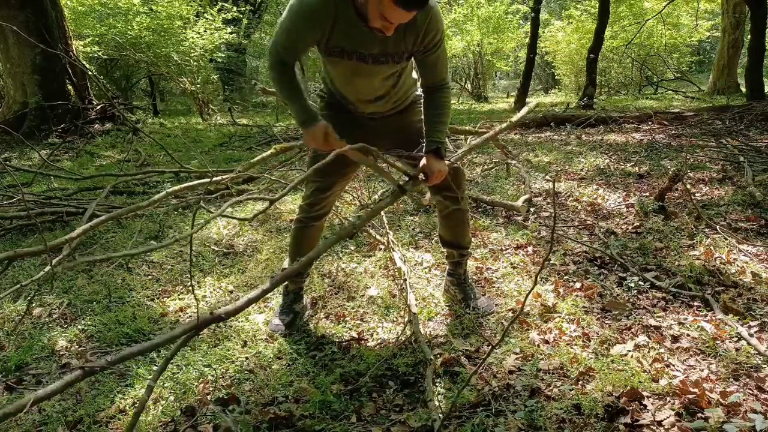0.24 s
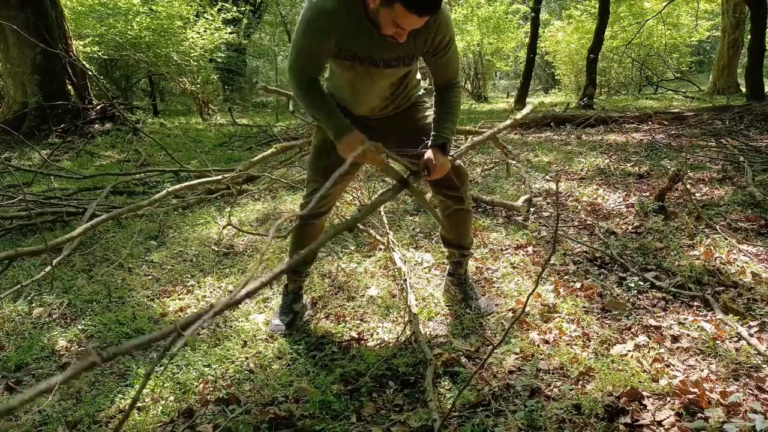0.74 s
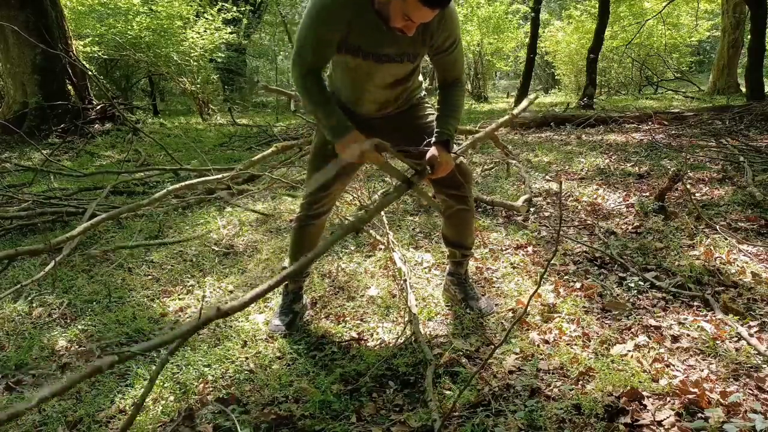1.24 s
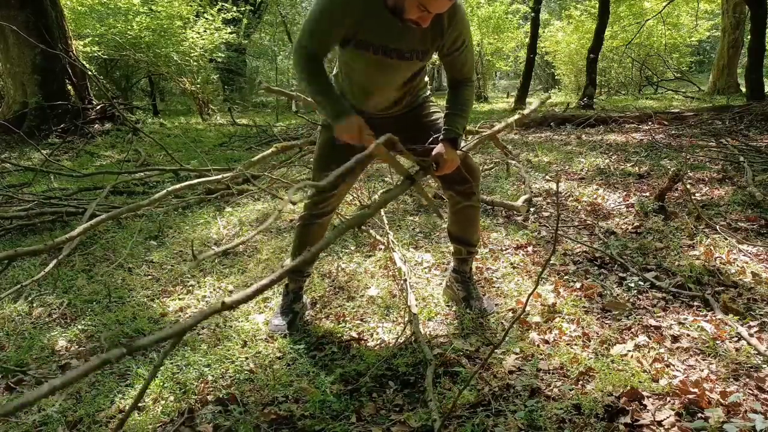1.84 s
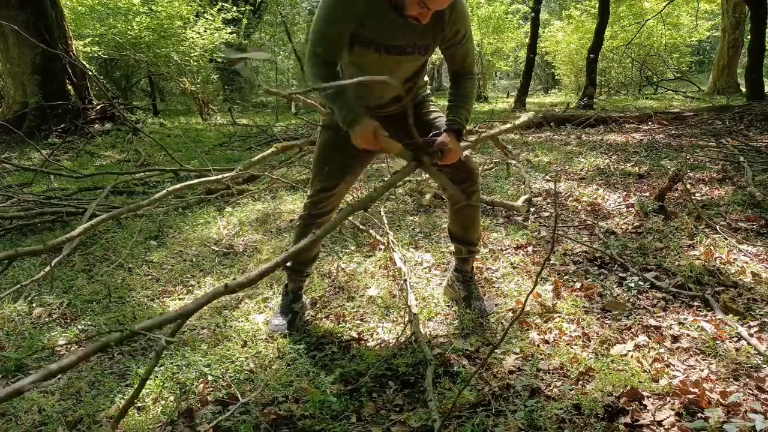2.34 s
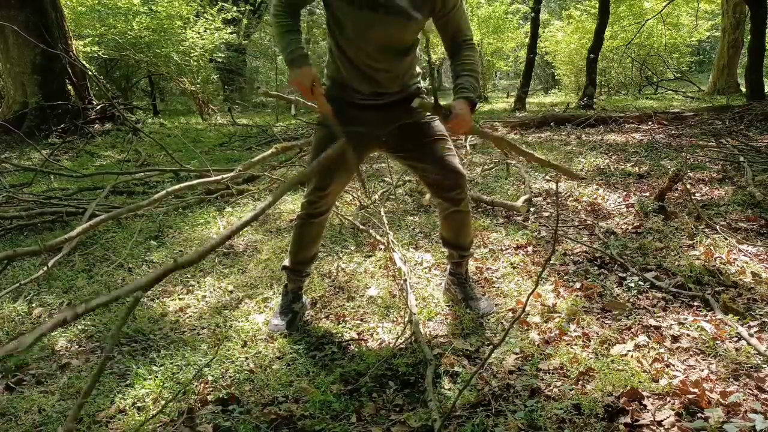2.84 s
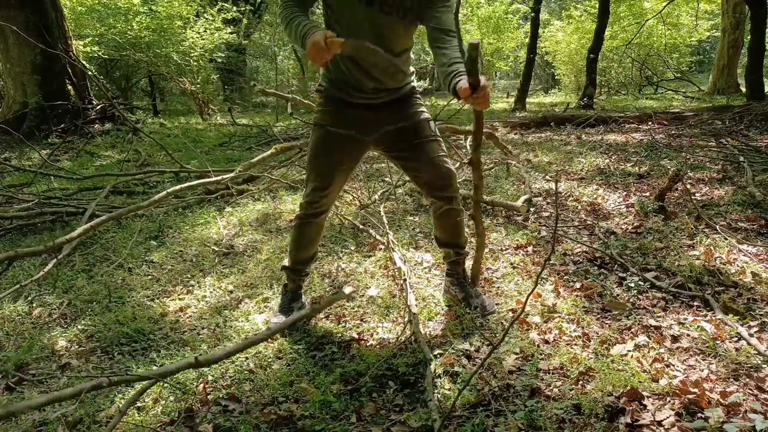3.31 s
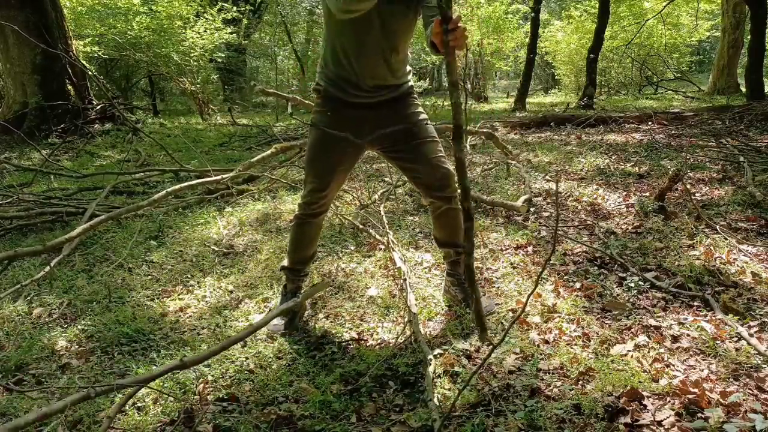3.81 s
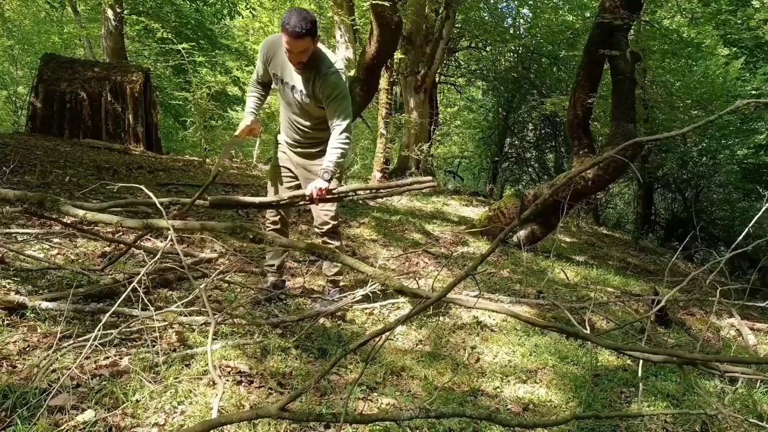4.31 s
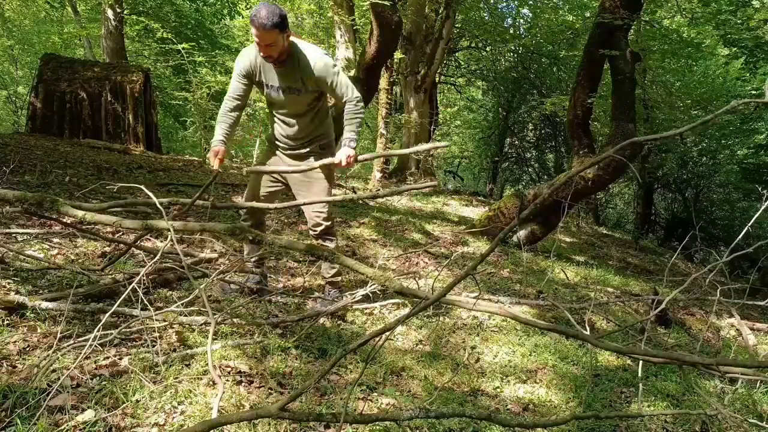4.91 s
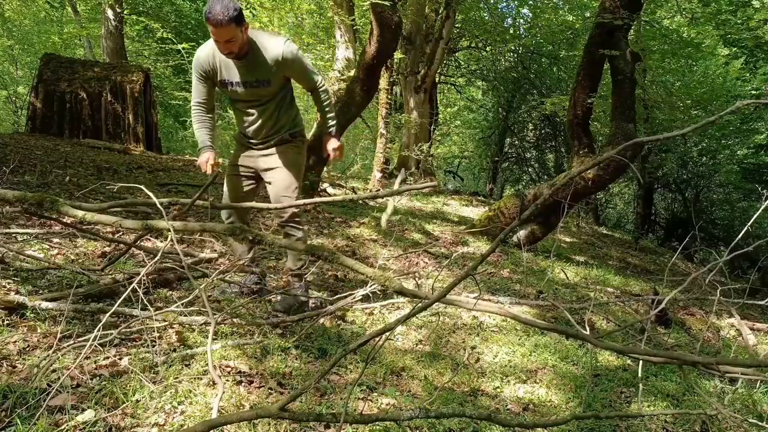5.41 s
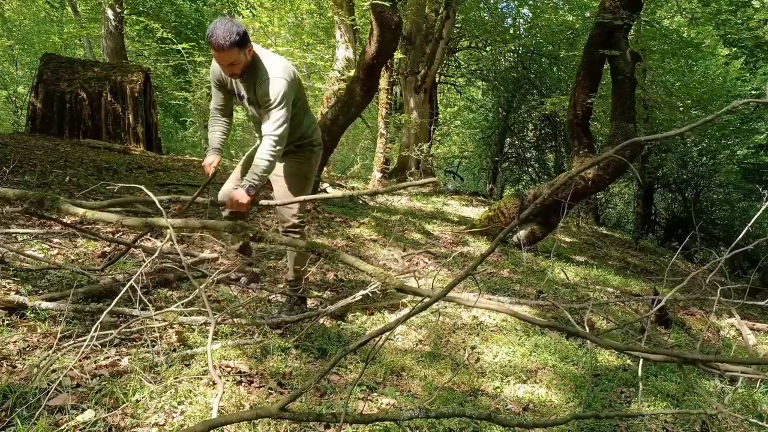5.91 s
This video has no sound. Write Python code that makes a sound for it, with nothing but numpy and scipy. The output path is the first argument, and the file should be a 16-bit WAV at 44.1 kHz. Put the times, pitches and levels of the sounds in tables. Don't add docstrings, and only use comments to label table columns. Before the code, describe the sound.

Brisk rasping strokes on wood, about seven a second, start softly and build with sharp dry cracks and a woody ring. The branch gives way, followed by thinning leaf rustle, twig snaps, a dull step and a hollow stick knock. The scene cuts to a hushed forest with distant birds and sparse ticks, ending in far-off rustling tugs and a dropped stick. Airy natural ambience, short scatter from trunks.

```python
import sys
import numpy as np
from scipy import signal
from scipy.fft import rfft, irfft, next_fast_len
from scipy.io import wavfile
from scipy.ndimage import uniform_filter1d

SR = 44100
rng = np.random.default_rng(int(sys.argv[2]) if len(sys.argv) > 2 else 0)


def put_to_file(sound):
    columns = np.atleast_2d(sound).T
    safe = np.clip(columns, -1, 1)
    whole_steps = np.round(safe * 32767)
    wavfile.write(sys.argv[1], SR, whole_steps.astype(np.int16))


def invert_db(x):
    u = np.asarray(x, float) / 20
    return 10 ** u


N = 271215

# (from [Hz], to [Hz])
ZONES_HZ = [(2000, 7000), (100, 500), (600, 1600), (9000, 15500)]
# (frequency [Hz], density [dB per Hz])
RUB_COLOUR = [(15, -72), (25, -34.5), (166, -8.5), (223, -4.5), (416, -6.5), (607, -4), (754, -4.5),
              (1330, -3.5), (1890, -3.5), (2280, -5.5), (2480, -3.5), (5570, -4), (8360, -11),
              (12900, -0.5), (16000, -6)]
# (frequency [Hz], width [Hz], level [dB])
BRANCH_MODES = [(230, 85, -5.5), (622, 69, -4.5), (1445, 300, -7.5), (2205, 450, -5.5), (3300, 910, -8.5),
                (5400, 550, -13.5)]
# (frequency [Hz], likeness [0-1])
LIKENESS = [(60, 0.4), (130, 0.9), (290, 0.75), (640, 0.5), (1410, 0.2), (3100, 0), (6820, 0), (15000, 0)]
# (frequency [Hz], density [dB per Hz])
AIR_COLOUR = [(15, -47), (25, -4), (134, 2.5), (677, -4.5), (1290, -10), (1790, -9.5), (2280, -20.5),
              (3430, -20), (5140, -23), (7310, -12.5), (16000, -32)]
# (frequency [Hz], left minus right [dB])
CAPSULE_LEAN = [(2000, 0.5), (6000, -1.4), (14000, -2)]
# (time [s], left minus right [dB])
PAN = [(0, -0.5), (.5, -0.1), (2.4, -0.7), (2.7, 0.7), (3.9, -1.3), (4.3, -2), (5.0, -1.3), (6.15, -0.27)]
# (time [s], level [dB])
STIR = [(0, -56.5), (.15, -64), (.33, -49.5), (1.1, -41.5), (2.1, -38.5), (2.4, -43.5), (2.68, -49.5),
        (3.05, -46), (3.3, -46), (3.55, -63), (3.89, -67.5), (4.02, -63), (4.14, -73.5), (4.3, -86.5),
        (4.55, -89.5), (4.67, -70.5), (5.15, -66.5), (5.38, -76)]
# (crest start [s], hold [s], crest [dB], sizzle re rasp [dB], branch ring [dB])
PUSHES = [
    (.052, 0.09, -41, 2, -0.5),
    (.362, 0.069, -33.5, -1, -0.5),
    (.637, 0.064, -33, 1, -1.5),
    (.918, 0.047, -29, 2, 1),
    (1.165, 0.072, -31, 0, 0.5),
    (1.447, 0.072, -28, .5, -1),
    (1.724, 0.074, -32.5, 4.5, 1.5),
    (1.993, 0.07, -29.5, -0.5, 2),
    (2.287, 0.051, -29.5, 2.5, 0),
]
# (crest start [s], hold [s], crest [dB], sizzle re rasp [dB], branch ring [dB])
PULLS = [(.192, 0.089, -35, -2.5, 1.5), (.484, 0.1, -29.5, -4, -3), (.578, 0.067, -35, -1, -2.5),
         (.758, 0.09, -31.5, 1.5, -0.5), (1.028, 0.098, -30.5, -0.5, -1), (1.3, 0.073, -28.5, -4, -2.5),
         (1.562, 0.07, -30, -2, 1), (1.847, 0.077, -33, -2.5, 0.5), (2.113, 0.054, -28.5, -2, 0.5),
         (2.413, .022, -30, 2, 0.5), (2.463, .034, -29, -1.5, -2)]
# (crest start [s], hold [s], crest [dB], sizzle re rasp [dB])
DRAGS = [(.302, 0.037, -42, 6), (.88, 0.015, -34, 4), (1.149, 0.0098, -29, 3), (1.415, 0.027, -41, 4.5),
         (1.677, .03, -34, 1.5), (1.935, .045, -38, 3), (2.238, .018, -39, -4), (2.563, 0.065, -43.5, 4.5),
         (2.715, 0.042, -36.5, -3.5), (2.875, 0.071, -36.5, 2.5), (3.009, 0.055, -41.5, 5),
         (3.163, 0.017, -38, 2), (3.21, 0.031, -41.5, 7), (3.288, 0.0265, -44, 7), (3.404, 0.015, -40.5, 5),
         (3.441, 0.043, -41, 5), (3.557, 0.14, -56, 4.5), (3.702, 0.035, -69, 16), (3.85, 0.03, -63, -13),
         (3.928, 0.035, -44.5, 2.5), (3.994, 0.022, -66, 8), (4.072, 0.064, -67, 9)]
# (crest start [s], hold [s], crest [dB], sizzle re rasp [dB])
FAR_DRAGS = [(4.611, 0.037, -69, 8.5), (4.724, 0.0534, -64, 15), (4.864, 0.066, -53, 3.5),
             (4.963, .062, -68.5, 7), (5.031, .061, -58.5, 4.5), (5.202, 0.02, -66.5, 11)]
# (crest start [s], hold [s], crest [dB], sizzle re rasp [dB], branch ring [dB])
FAR_TUGS = [
    (5.426, 0.039, -58, 9.5, 0),
    (5.485, 0.027, -45.5, 2.5, 3.5),
    (5.53, 0.033, -43, -1, -3),
    (5.577, 0.075, -41, 1.3, 2),
    (5.65, 0.13, -51.5, 2.5, 1),
    (5.785, .075, -47.5, 6, -1),
    (5.87, 0.058, -56, 6.5, -1),
    (5.925, .1, -49, 2.5, 4),
    (6.03, 0.12, -59, 1, 0),
    (6.115, 0.054, -54, 6.5, 7),
]
# (rise [dB/s], fall [dB/s], wood body re rasp [dB], branch ring re rasp [dB])
PUSH = (600, 601, -15.5, -8)
PULL = (652, 652, -24, -7.5)
DRAG = (354, 174, -20.5, -11)
FAR_DRAG = (324, 103, -15, -18)
FAR_TUG = (500, 350, -14, -12)
# (time [s], peak [dB], ring [Hz], bright edge re
# peak [dB])
TICKS = [(.1622, -46, 3700, 11), (0.4336, -29.5, 5000, 7), (.824, -17.5, 5770, -3.5),
         (0.9407, -21.5, 2240, 5.5), (.951, -23.5, 5500, 1), (1.1747, -12.5, 5250, 0),
         (1.449, -20.5, 5680, -3), (1.469, -24, 5000, -4), (1.5747, -14, 4220, 2), (1.7236, -34, 4130, 3),
         (1.794, -23, 5000, 3), (1.8185, -26, 2500, -10), (1.924, -25, 6630, 7), (2.1387, -15, 3300, -9.5),
         (2.201, -27.5, 3790, -8), (2.2472, -27, 5170, 7), (2.4278, -20.5, 3700, -1.5),
         (2.4288, -18, 2000, -15), (2.4418, -21, 2050, -15), (2.4428, -16, 5370, -3.5),
         (2.4858, -17, 1620, -18), (.7722, -23, 2210, -10), (2.4666, -22, 5040, 3), (2.7213, -34, 5000, -2),
         (2.742, -21, 4560, -8), (2.801, -40, 5500, -6), (2.823, -28.5, 4910, -11), (2.889, -30, 5500, -3),
         (2.924, -28, 4600, -8), (3.156, -37, 5000, 11), (3.1946, -32, 7490, 4), (3.296, -35, 6000, 10),
         (3.308, -34, 8000, 7), (3.377, -29, 4910, -10), (3.4098, -35, 6000, 10), (3.469, -31, 8000, 3),
         (3.7155, -51, 4220, 10), (3.7812, -48, 5000, 6), (3.9045, -50, 5000, 8),
               (3.9195, -44, 5000, 12), (4.0007, -41, 7230, 1), (4.0367, -43, 4910, 1),
               (4.1429, -66, 5860, 13), (4.1478, -51, 6200, 3), (4.2035, -58, 4100, 4),
               (4.3816, -59, 6930, -7), (4.4206, -68, 7000, -5), (4.7653, -50, 6030, 8),
               (4.8059, -54, 7150, 11), (4.993, -50, 5340, 9), (5.2363, -57, 5000, 8),
               (5.3572, -59, 5080, 8), (5.425, -55, 5080, 12), (5.5124, -41, 3360, 13),
               (5.814, -37, 6000, 0), (5.847, -35.5, 6500, 2), (6.0405, -44, 6630, 7)]
# (time [s], peak [dB], ring [Hz], tick re peak [dB])
FIBRES = [(0.5428, -27, 2630, -11), (0.601, -23.5, 5470, -9.5), (.824, -19.5, 5800, -11),
          (0.8846, -23, 4020, 4), (0.931, -27.5, 3525, 2), (1.1735, -19.5, 6380, -2),
          (1.3219, -19.5, 3010, -0.5), (1.4482, -26, 2300, -10), (1.562, -25, 4000, -7),
          (1.5805, -20.5, 3410, -3), (1.723, -24.5, 4400, 1), (1.9916, -25.5, 1770, -9),
          (2.138, -20.5, 3200, -6), (2.165, -17, 5340, -10), (2.1997, -25.5, 5100, -10.5),
          (2.2418, -22.5, 5500, 1.5), (2.412, -25, 4820, -8), (2.4264, -21.5, 4520, -9),
          (2.441, -16, 5480, -7.5), (2.465, -23.5, 5100, -5), (2.4842, -17, 1751, -12)]
# (time [s], peak [dB], ring [Hz], tick re peak [dB], thud re peak [dB])
TWIGS = [(2.7412, -28, 2090, 2.5, -20), (2.7195, -36, 880, -4, -26), (2.957, -39, 850, 6, -15),
         (2.821, -30, 4750, -11, -41), (2.8464, -39, 6940, 10, -26), (2.9212, -24.5, 1190, -14, -22),
         (3.024, -40.5, 2080, 20, -30), (3.1188, -35.5, 1130, -1.96, -22.5), (3.136, -35, 1160, -2.5, -15),
         (3.1654, -31, 5400, 6, 5.5), (3.2216, -32, 5100, 3, -22), (3.3253, -36, 5800, 13, 2),
         (3.3758, -35, 4100, -11, -35), (3.4165, -31.5, 6550, 6.5, -7), (3.4651, -35, 5880, 2, -32),
         (3.746, -47.5, 5400, 9, -25), (3.828, -49.5, 1470, -31, 3), (3.905, -55.5, 3070, 11, -19),
         (3.933, -45.5, 2240, 17, -29.5), (3.9998, -50, 2190, -8, -28)]
# (time [s], peak [dB], ring [Hz], tick re peak [dB], thud re peak [dB])
FAR_TWIGS = [(4.2153, -61.5, 5570, 5, -25), (4.3804, -71, 1815, -6, -18), (4.5211, -68.5, 3890, -8.5, -8.5),
             (4.605, -57, 3360, 0, -26), (4.8044, -60.5, 6800, 19, -22), (4.8918, -52, 4900, 16.5, 8),
             (5.08, -55, 1230, -8, 8), (5.448, -47.5, 1760, 2, 10), (5.5443, -42, 1910, 3, 3),
             (5.787, -45, 1090, -9.5, -10), (5.8104, -38, 6800, -10, -8)]
# (time [s], peak [dB], pitch [Hz], length [s])
STEPS = [(3.217, -41.5, 460, 0.027), (3.233, -43.5, 190, 0.031), (3.925, -55, 256, 0.028),
         (4.722, -57, 460, 0.058), (4.894, -61, 625, 0.027), (5.296, -66.5, 498, 0.039),
         (5.603, -39.5, 226, 0.041), (5.804, -40.5, 620, 0.012), (5.811, -58, 226, 0.038),
         (5.928, -54.5, 750, 0.11), (5.955, -61.5, 129, 0.076), (6.086, -60, 223, 0.024),
         (6.096, -54.5, 990, 0.096)]
# (time [s], peak [dB], bounce spread [s])
KNOCK = [
    (3.6205, -27.5, 0.00602),
]
# (time [s], peak [dB], bounce spread [s])
DROP = [
    (5.5792, -20.5, .012),
]
# (frequency [Hz], level [dB], T60 [s])
KNOCK_MODES = [(1258, -6.5, 0.11), (1620, -7, 0.072), (1980, -3, 0.084), (2300, -0.5, 0.072),
               (2890, -4.5, 0.049), (3440, -7, 0.047), (4685, -6, 0.039)]
# (frequency [Hz], level [dB], T60 [s])
DROP_MODES = [(226, -8.5, .09), (403, -2, 0.048), (653, -5.5, 0.11), (1010, 0, 0.077), (1350, -4.5, 0.068),
              (1460, -1, 0.046), (2220, -6, 0.025), (2660, -6, 0.026), (3400, -0.5, 0.0084)]
# (time [s], length [s], from [Hz], to [Hz], level [dB])
WHISTLES = [(4.335, .025, 3750, 3150, -82), (4.475, .045, 4500, 4100, -79), (4.515, .05, 3950, 3750, -80),
            (4.53, .04, 3600, 3320, -80), (4.515, .06, 4650, 4350, -84), (4.56, .09, 3330, 3300, -72),
            (4.56, .11, 4300, 3900, -80), (4.63, .08, 7300, 7100, -80), (4.655, .09, 3290, 3260, -77),
            (4.675, .03, 3750, 3650, -78), (4.715, .09, 3500, 3460, -74), (5.133, .046, 3150, 3040, -69),
            (5.18, .04, 3150, 2900, -78), (5.245, .036, 4200, 4100, -78), (5.3, .13, 2320, 2260, -79),
            (5.303, .045, 3850, 3830, -78), (6.12, .036, 3980, 3920, -63)]

AIR_DB = -77
BREAK_S = 2.5
SHOULDER_DB, REST_SIZZLE_DB = 5.5, 1.5
STIR_BODY_DB, STIR_BRANCH_DB = -18, -11
STEP_BODY_DB, STEP_FALL_DB_S = -13, 200.5
BODY_LAG_S = 0.015
SETTLE_DB_S = 3.5
RUMBLE_HZ, RUMBLE_S = 110, 0.22
GRIP_SHIFT, GRIP_SWING_DB = 0.047, 6.5
TICK_T60_S, EDGE_HZ, EDGE_T60_S = 0.0056, 12700, 0.0034
CRUMBLE_DB, CRUMBLE_T60_S = -6.5, 0.016
SNAP_T60_S, SNAP_T60_SLOPE = 0.049, 0.23
CLICK_DB, FIBRE_THUD_DB = -6, -25
TREES_T60_S, TREES_DB = 0.077, -19
GAP_START_S, GAP_END_S, GAP_FADE_S = 4.122, 4.138, 0.002
TOP_HZ = 15900
SIDES = np.array([[1], [-1]])


def colour(x, points):
    size = next_fast_len(x.shape[-1])
    hz, db = np.transpose(points)
    bin_hz = np.arange(size // 2 + 1) * SR / size
    gain = invert_db(np.interp(np.log(bin_hz + 1), np.log(hz), db))
    return irfft(rfft(x, size) * gain, size)[..., :x.shape[-1]]


def band(x, lo_hz, hi_hz):
    sos = signal.butter(2, [lo_hz, min(hi_hz, 0.45 * SR)], "band", fs=SR, output="sos")
    return signal.sosfilt(sos, x)


def unit(x):
    return x / np.sqrt(np.mean(x ** 2))


def walk(rate_hz):
    k = int(SR / rate_hz)
    held = np.repeat(rng.standard_normal(N // k + 1), k)
    return 1.18 * uniform_filter1d(held, k)[:N]


def pair(hz, size):
    like_hz, likeness = np.transpose(LIKENESS)
    like = np.clip(np.interp(np.log(hz), np.log(like_hz), likeness), 0, 1) ** 0.49
    mid, side = rng.standard_normal((2, size))
    return np.sqrt((1 + like) / 2) * mid + np.sqrt((1 - like) / 2) * side * SIDES


def ring(hz, t60_s, size):
    t = np.arange(size) / SR
    return np.sin(2 * np.pi * hz * t) * invert_db(-60 * t / max(t60_s, 1e-3))


def add(out, s, x):
    i = int(s * SR)
    out[:, i:i + x.shape[-1]] += x[..., :N - i]


def trees(x, t60_s, db):
    t = np.arange(SR // 2) / SR
    tail = rng.standard_normal((2, len(t))) * invert_db(-60 * t / t60_s) * (t > 0.004)
    tail *= invert_db(db) / np.sqrt((tail ** 2).sum(axis=1, keepdims=True))
    return x + signal.fftconvolve(x, tail, axes=1)[:, :N]


def air():
    mid, side = rng.standard_normal((2, N))
    level = invert_db(AIR_DB + 1.0 + 0.8 * walk(2.1))
    return level * unit(colour(mid + 0.93 * side * SIDES, AIR_COLOUR))


def swell(t, s, hold_s, crest_db, rise_db_s, fall_db_s):
    off_centre = np.abs(2 * (t - s) / max(hold_s, 0.004) - 1)
    crest = crest_db - SHOULDER_DB * np.minimum(off_centre, 1)
    return crest - rise_db_s * np.maximum(s - t, 0) - fall_db_s * np.maximum(t - s - hold_s, 0)


def effort(t):
    grid_s = np.arange(0, N / SR + 0.1, 0.001)
    rest_db = np.array([[0], [STIR_BODY_DB], [STIR_BRANCH_DB], [REST_SIZZLE_DB]])
    power = invert_db(2 * (np.interp(grid_s, *np.transpose(STIR)) + rest_db))
    kinds = ((PUSHES, PUSH), (PULLS, PULL), (DRAGS, DRAG), (FAR_DRAGS, FAR_DRAG), (FAR_TUGS, FAR_TUG))
    for rows, (rise_db_s, fall_db_s, body_db, branch_db) in kinds:
        for s, hold_s, crest_db, sizzle_db, *ring_db in rows:
            level_db = swell(grid_s, s, hold_s, crest_db, rise_db_s, fall_db_s)
            share_db = np.array([[0], [body_db], [branch_db + sum(ring_db)], [sizzle_db]])
            power = power + invert_db(2 * (level_db + share_db))
    rasp, body, branch, sizzle = 10 * np.log10(power)
    tread = sum(invert_db(2 * swell(grid_s, s, length_s, db + STEP_BODY_DB, 900, STEP_FALL_DB_S))
                for s, db, hz, length_s in STEPS)
    body = np.interp(grid_s - BODY_LAG_S, grid_s, body)
    body = body - SETTLE_DB_S * (np.minimum(grid_s, BREAK_S) - 1)
    body = 10 * np.log10(invert_db(2 * body) + tread)
    return [np.interp(t, grid_s, db) for db in (rasp, body, branch, sizzle)]


def crackle(rate_hz, spread_db, tail_s):
    size_db = spread_db * rng.exponential(1, N).clip(0, 3.4)
    hits = (rng.random(N) < rate_hz / SR) * invert_db(2 * size_db)
    power = signal.lfilter([1], [1, -np.exp(-1 / (max(tail_s, 1e-4) * SR))], hits)
    return power / power.mean()


def rustle(zone_db):
    f = np.arange(20, 16000.)
    hz, db = np.transpose(RUB_COLOUR)
    power = invert_db(2 * np.interp(np.log(f), np.log(hz), db))
    lift_db = []
    for db, (lo, hi) in zip(zone_db, ZONES_HZ):
        zone_power = power[(f > lo) & (f < hi)].sum() * 2 / SR
        lift_db.append(db - 10 * np.log10(zone_power))
    lift_db = np.array(lift_db)[[1, 2, 0, 3]]
    centres = np.log([250, 1400, 4800, 12000])
    shared = 0.42 + 0.34 * crackle(1500, 3.6, 0.0022) + 0.17 * crackle(130, 4.2, 0.0062)
    out = np.zeros((2, N))
    for hz in 30 * 2 ** np.arange(0, 9.3, 0.5):
        place = np.interp(np.log(hz), centres, np.arange(4))
        k = min(int(place), 2)
        db = lift_db[k] + (place - k) * (lift_db[k + 1] - lift_db[k]) + 1.86 * walk(25)
        if hz < RUMBLE_HZ:
            db = uniform_filter1d(db, int(RUMBLE_S * SR))
        own = 0.42 + 0.27 * crackle(40 + hz / 30, 4.7, 16.0 / hz + 0.0014)
        push = pair(hz, N) * np.sqrt(shared * own)
        out += invert_db(db) * band(push, hz / 2 ** 0.24, hz * 2 ** 0.29)
    rung = np.zeros((2, N))
    for hz, width_hz, db in BRANCH_MODES:
        for k in (1 - GRIP_SHIFT, 1 + GRIP_SHIFT):
            swing = invert_db(db - 4 + GRIP_SWING_DB * np.minimum(walk(12), 1.5))
            rung += swing * band(out, hz * k - width_hz / 4.14, hz * k + width_hz / 3.4)
    sawing = np.where(np.arange(N) / SR < BREAK_S, 1, 0.3)
    return colour(out + invert_db(-0.5) * sawing * rung, RUB_COLOUR)


def strain(t, hush_db=0.5, before_s=0.016, lift_db=5.5, lift_s=0.0076):
    grid_s = np.arange(0, N / SR + 0.1, 0.001)
    loading = sum(np.exp(-((grid_s - row[0] + before_s) / before_s) ** 2) for row in breaks())
    airborne = sum(np.exp(-((grid_s - row[0] + lift_s) / lift_s) ** 2) for row in KNOCK + DROP)
    return invert_db(-np.interp(t, grid_s, hush_db * loading + lift_db * airborne))


def ticks():
    out, size = np.zeros((2, N)), 1024
    crumble = invert_db(CRUMBLE_DB - 60 * np.arange(size) / SR / CRUMBLE_T60_S)
    for s, db, hz, edge_db in TICKS:
        low, high = rng.standard_normal((2, 2, size))
        body = ring(hz, TICK_T60_S, size) + crumble * unit(band(low, hz / 1.6, hz * 1.4))
        edge = ring(EDGE_HZ, EDGE_T60_S, size) + crumble * unit(band(high, 10000, 16000))
        add(out, s, invert_db(db - 4.0) * (body + invert_db(edge_db) * edge))
    return out


def breaks():
    rows = [tuple(row) + (FIBRE_THUD_DB,) for row in FIBRES] + list(TWIGS) + list(FAR_TWIGS)
    return [(s, db, hz, thud_db, tick_db, SNAP_T60_S * (hz / 1000) ** -SNAP_T60_SLOPE)
            for s, db, hz, tick_db, thud_db in rows]


def snaps():
    out, size = np.zeros((2, N)), 4096
    t = np.arange(size) / SR
    for s, db, hz, thud_db, tick_db, t60_s in breaks():
        fall = invert_db(-60 * t / max(t60_s, 0.004)) * np.minimum(t / 0.00062, 1)
        fall = 1.02 * fall + 0.49 * np.exp(-((t - 0.0012) / 0.00066) ** 2)
        tear = 0.38 * unit(band(pair(hz, size), hz / 1.29, hz * 1.185))
        tear = tear + 0.3 * unit(band(pair(hz, size), 1200, 7500))
        tick_gain = invert_db(max(tick_db, -8))
        tick = tick_gain * unit(band(pair(12000, size), 11000, 23000))
        thud = unit(band(pair(400, size), 180, 1100))
        thud = thud * invert_db(-30 * t / max(t60_s, 0.004)) * np.minimum(t / 0.0063, 1)
        snap = (tear + 0.73 * tick) * fall + 0.19 * ring(hz, 1.3 * t60_s, size) + 0.2 * invert_db(thud_db) * thud
        add(out, s, invert_db(db) * snap)
        click = ring(hz, 0.0091, 256) + tick_gain * ring(12600, 0.002, 256)
        add(out, s + 0.000802, invert_db(db + CLICK_DB) * np.ones((2, 1)) * click)
    return out


def steps():
    out, size = np.zeros((2, N)), 8192
    t = np.arange(size) / SR
    for s, db, hz, length_s in STEPS:
        shape = np.minimum(t / 0.014, 1) * np.exp(-(t / length_s) ** 3)
        add(out, s, invert_db(db - 4.0) * shape * unit(band(pair(hz, size), hz / 1.5, hz * 1.23)))
    return out


def stick(event, modes, count, longest_s, crunch_db):
    out, size = np.zeros((2, N)), 8192
    s, db, spread_s = event[0]
    for k, chance in enumerate(rng.standard_normal((count, 2, len(modes)))):
        hit = np.zeros(size)
        for (hz, mode_db, t60_s), c, e in zip(modes, *chance):
            mode = ring(hz * (1 + 0.0094 * e), min(t60_s, longest_s), size)
            hit += invert_db(mode_db + 0.63 * c) * np.sign(c) * mode
        add(out, s + spread_s * k / count, invert_db(db - 14.0 - 4.7 * k / count) * hit)
    grind = sum(invert_db(mode_db) * unit(band(pair(hz, size), hz / 1.1, hz * 1.195))
                for hz, mode_db, t60_s in modes)
    fade_db = -60 * np.arange(size) / SR / (1.64 * longest_s)
    add(out, s, invert_db(db + crunch_db + fade_db) * grind)
    return band(out, 140, 9000)


def birds():
    out, waver = np.zeros((2, N)), 1 + 0.008 * walk(90)
    for s, length_s, from_hz, to_hz, db in WHISTLES:
        size = int(length_s * SR)
        pitch_hz = np.linspace(from_hz, to_hz, size) * waver[int(s * SR) - size:][:size]
        tone = np.sin(2 * np.pi * np.cumsum(pitch_hz) / SR)
        add(out, s, invert_db(db + 2) * signal.windows.tukey(size, 0.5) * tone)
    return trees(out, 0.32, 2.5)


def scene():
    t = np.arange(N) / SR
    pan_db = np.interp(t, *np.transpose(PAN))
    sticks = stick(KNOCK, KNOCK_MODES, count=3, longest_s=0.085, crunch_db=-14)
    sticks = sticks + stick(DROP, DROP_MODES, count=5, longest_s=0.11, crunch_db=-20.5)
    rubbing = strain(t) * rustle(effort(t))
    impacts = band(snaps() + ticks(), 140, 19000) + sticks + steps()
    work = rubbing + trees(impacts, TREES_T60_S, TREES_DB)
    return work * invert_db(np.array([pan_db, -pan_db]) / 2) + birds() + air()


def top_cut(x):
    return signal.sosfilt(signal.butter(12, 17040, fs=SR, output="sos"), x)


def record(dry):
    t = np.arange(N) / SR
    gap = np.clip(np.maximum(GAP_START_S - t, t - GAP_END_S) / GAP_FADE_S, 0, 1)
    leaned = [colour(x, [(hz, sign * db / 2) for hz, db in CAPSULE_LEAN]) for x, sign in zip(dry, (1, -1))]
    low_pass = signal.ellip(10, 0.2, 75, TOP_HZ, fs=SR, output="sos")
    mix = signal.sosfilt(low_pass, np.array(leaned)) * gap
    return top_cut(mix)


dry = scene()
out = record(dry)
put_to_file(out)
```